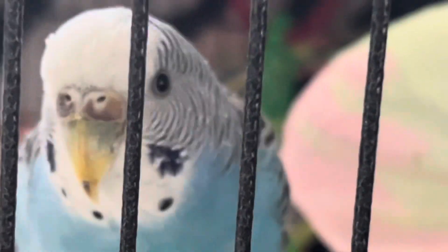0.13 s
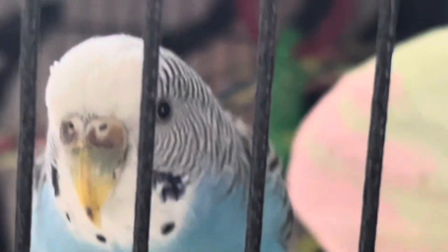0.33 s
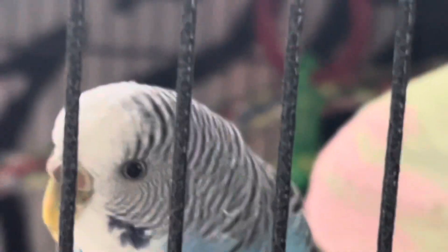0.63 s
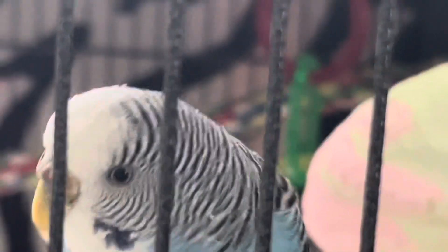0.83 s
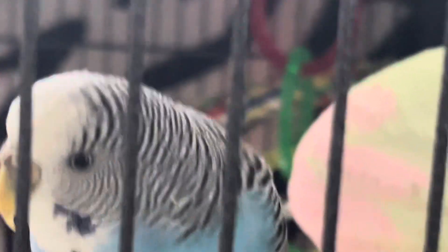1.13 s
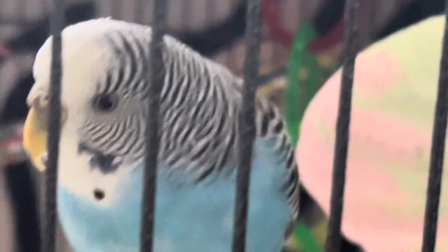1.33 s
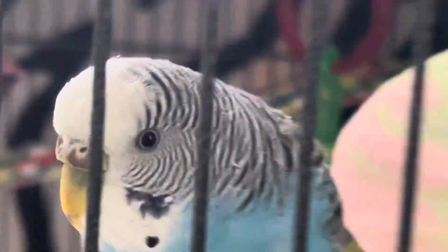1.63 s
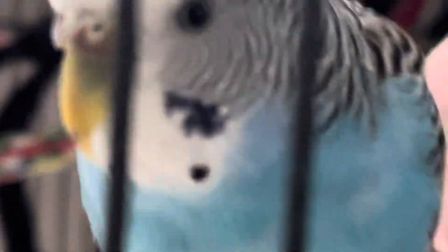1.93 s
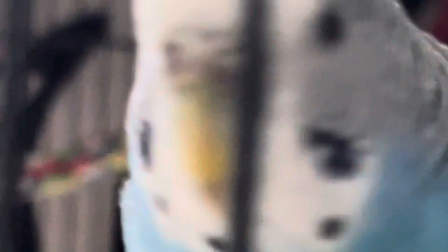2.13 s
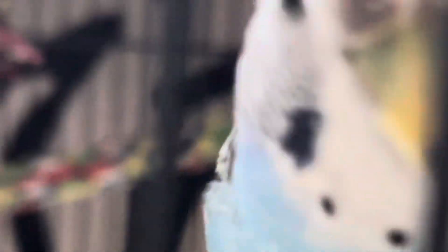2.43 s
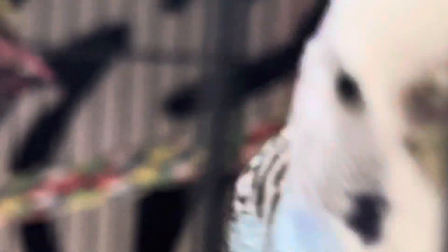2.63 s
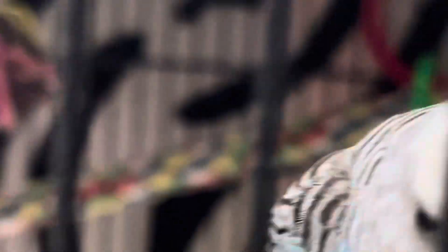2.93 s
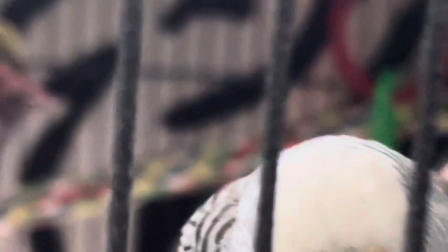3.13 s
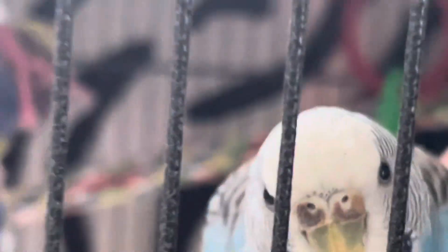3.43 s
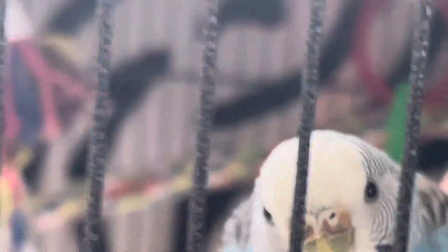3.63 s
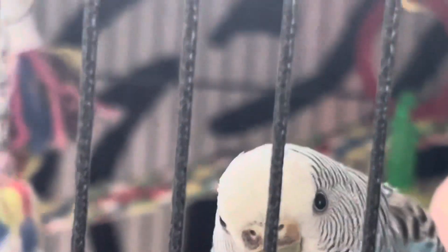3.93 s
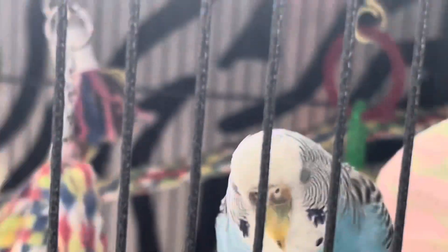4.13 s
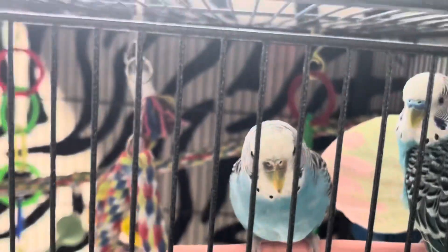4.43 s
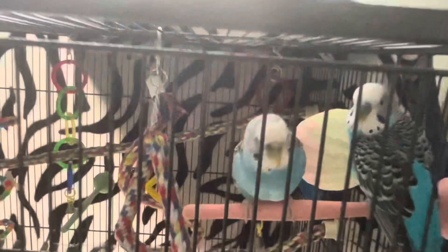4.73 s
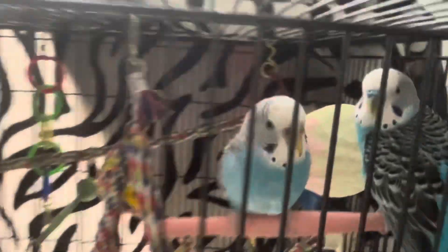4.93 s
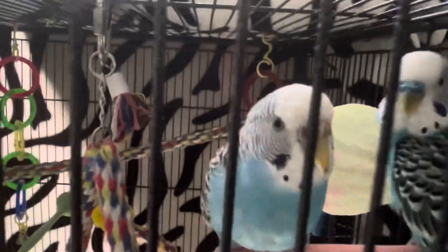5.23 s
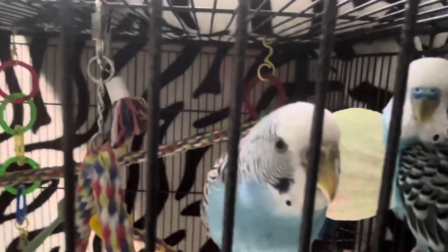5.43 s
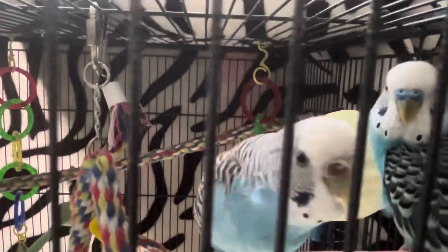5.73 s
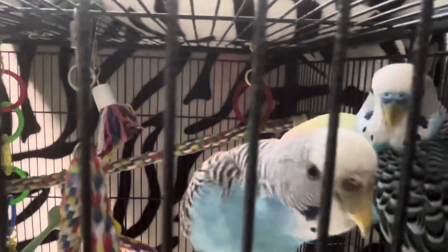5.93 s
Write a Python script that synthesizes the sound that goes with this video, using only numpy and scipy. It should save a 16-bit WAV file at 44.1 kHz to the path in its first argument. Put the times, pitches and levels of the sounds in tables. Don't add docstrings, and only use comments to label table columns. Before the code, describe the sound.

A quiet living room with a faint low hum, recorded close in stereo beside a budgerigar cage. Feathers stir, then from 0.23 to 0.44 s a loud, rapid run of fractured chirps ends in a strong pressed call. At 0.67-1.1 s come fluttering, hoarse chirps, running into a softer swooping warble with small rasps until 1.46 s. After a pause, beak clicks at 1.9 s and a low perch thump at 2.0 s. From 2.35 to 3.3 s, clipped low chatter mixes with clicks and dry rasps, thinning out. A low chirp at 3.6 s and a thump precede bright, wide-ranging whistles at 3.75-3.95 s, loud chirps at 4.04-4.22 s and frayed squawks with feather rustle at 4.34-4.5 s. Then a faint creaky rasp at 4.7 s, a short whistle and click near 4.96 s, and from 5.56 s clicks and soft, airy murmurs until about 6.1 s.

```python
import sys
import numpy as np
from scipy import signal
from scipy.fft import rfft, irfft, next_fast_len
from scipy.io import wavfile

SR = 44100
rng = np.random.default_rng(int(sys.argv[2]) if len(sys.argv) > 2 else 0)


def generate_wav(sig):
    pcm = np.round(np.clip(np.atleast_2d(sig).T, -1, 1) * 32767).astype(np.int16)
    wavfile.write(sys.argv[1], SR, pcm)


def ratio(d):
    e = np.asarray(d, float) / 20
    return 10 ** e


N = 268172

SLIDE, FALL, SWOOP, SCOOP = (1.0, -.88), (1.0, -.42), (1.0, .06), (1.0, .48)
DIP, FLICK, LIFT, EASE = (0.801, 1.0), (0.11, 0.99), (-.38, 1.0), (1.0, -.6)


def rms_one(x):
    return x / np.sqrt(np.mean(np.abs(x) ** 2) + 1e-20)


def at_hz(points, hz):
    point_hz, point_db = np.array(points).T
    return np.interp(np.log(hz + 1), np.log(point_hz), point_db)


def colour(x, points, turn=None):
    size = next_fast_len(N)
    hz = np.fft.rfftfreq(size, 1 / SR)
    lag = np.exp(-1j * np.pi * at_hz(turn, hz)) if turn else 1
    return irfft(rfft(x, size) * ratio(at_hz(points, hz)) * lag, size)[:N]


def low_pass(x, cutoff_hz):
    return signal.sosfilt(signal.butter(2, cutoff_hz, fs=SR, output="sos"), x)


def wobble(rate_hz):
    return rms_one(low_pass(rng.standard_normal(N), rate_hz))


def add(track, s, sound):
    i = round(s * SR)
    track[i:i + len(sound)] += sound[:N - i]


def steady_hum(spectrum, level_db):
    level = ratio(level_db + 0.8 * wobble(3.4))
    return level * rms_one(colour(rng.standard_normal(N), spectrum))


# (f/Hz, level/dB)
HUM = [(24, -32.5), (50, 7), (76, 0.5), (125, -8), (426, -16), (747, -25.5), (1500, -37), (1950, -53.5),
       (3300, -120)]
# (f/Hz, level/dB)
HUM_SIDE = [(15, -54), (25, 5), (305, -1), (1170, -9), (1530, -4.5), (2920, -21), (5010, -58), (5730, -20),
            (8580, -24.5), (13000, -60)]


def home_hum():
    return steady_hum(HUM, -53), steady_hum(HUM_SIDE, -64.0)


def bouts(events):
    t = np.arange(N) / SR
    levels_db = [peak_db - 10 * np.abs(t - s) / fade_s for s, peak_db, fade_s in events]
    return ratio(np.max(levels_db, axis=0))


# (f/Hz, level/dB per Hz)
FEATHERS = [(710, -54.5), (1200, -6.5), (1880, 2), (2260, -10), (3940, -5), (7980, -22.5), (13100, -17),
            (15500, -57.5)]
# (f/Hz, level/dB per Hz)
STIR = [(500, -18), (900, -8), (2000, 7), (3500, -4.0), (5500, -11), (7500, -15), (9000, -45.0)]
# (t/s, peak level/dB, time to fade by 10 dB/s)
SHIFTS = [(0.27, -56, 0.22), (1.1, -68, .25), (1.49, -56, 0.04), (1.72, -66, .07), (2.05, -68, .15),
          (2.85, -65, 0.1), (3.3, -60, .2), (4.15, -61.5, 0.2), (4.37, -42, 0.0682), (4.72, -65, 0.3),
          (4.97, -54.5, 0.19), (5.39, -65, 0.23), (5.72, -57, 0.22)]
# (t/s, peak level/dB, time to fade by 10 dB/s)
STIRS = [
    (0.88, -51.5, 0.02),
    (2.76, -63, 0.05),
    (3.35, -59, 0.06),
    (4.56, -67, .12),
    (5.16, -67, .07),
    (5.8, -66.5, .1),
]


def rustle():
    sparks = 1 + 2.5 * (rng.random(N) < .01)
    grains = rng.standard_normal(N) * sparks * ratio(2.8 * wobble(25.0))
    stir = rng.standard_normal(N) * ratio(2.5 * wobble(12.0))
    still_db, far_still_db = -86.0, -73.5
    feathers = (bouts(SHIFTS) + ratio(still_db)) * rms_one(colour(grains, FEATHERS))
    far = (bouts(STIRS) + ratio(far_still_db)) * rms_one(colour(stir, STIR))
    return feathers + far


# (t/s, depth level/dB, half width/s)
CATCHES = [(0.2915, -8, .001), (0.2965, -9, .001), (0.3205, -12, .001), (0.3355, -6, .001),
           (0.3425, -12, .001), (0.3675, -8, .0015), (0.3775, -6, .001), (0.687, -8, .001),
           (0.693, -10, .001), (0.7285, -8, .003), (0.747, -6, .0015), (4.1375, -10, .0015),
           (4.159, -16, .001), (4.1975, -9, .001), (4.2005, -7, .0007), (4.2063, -7, .001),
           (4.365, -8, .004), (4.3745, -7, .001), (4.3845, -7, .0007), (4.3945, -14, .001),
           (4.4035, -10, .001), (4.426, -8, .002), (4.4325, -8, .0015), (4.4425, -6, .0015),
           (4.4515, -9, .0015), (4.4605, -7, .001), (4.108, -8, .004), (1.285, -10, .003),
           (1.336, -9, .003), (1.429, -10, .003), (0.256, -9, .006), (4.092, -10, .003), (4.174, -6, .005),
           (4.4665, -6, .001)]


def catches():
    t = np.arange(N) / SR
    shut_db = np.zeros(N)
    for s, depth_db, half_s in CATCHES:
        near = slice(round((s - .02) * SR), round((s + .02) * SR))
        shut_db[near] += depth_db * np.exp(-((t[near] - s) / half_s) ** 2)
    return ratio(shut_db)


def swell(n, edge_s, arch):
    t = np.arange(n) / SR
    edges = np.clip(np.minimum(t, t[-1] - t) / edge_s, 0, 1)
    middle = 1 - arch + arch * np.sin(np.pi * (t / t[-1]) ** .75)
    return np.sin(np.pi / 2 * edges) ** 2 * middle


# (f/Hz, level/dB)
THROAT = [(400, -17), (900, -3.5), (1400, -1), (2000, 2), (2800, -3), (3700, -4), (5000, -9), (8000, -13),
          (15000, -13)]
# (f/Hz, level/dB per Hz)
BREATH = [(900, -47), (1500, -15), (2200, 22.5), (4000, 6), (6000, -5), (10000, -7), (15000, 2)]


def sing(notes, octave_db, tilt_db, rough, blur_hz, breath_db, arch, waver=0.014, throbs=None, sharp=0.0, fray=0.1):
    voice, air, carried = np.zeros(N), np.zeros(N), 0
    sway, shake, drift = wobble(blur_hz), wobble(blur_hz), wobble(70.0)
    k = np.arange(1, 13)[:, None]
    for row, (s, end_s, middle_hz, bend_hz, level_db, gesture) in enumerate(notes):
        start_hz, end_hz = middle_hz + bend_hz * np.array(gesture)
        i = round(s * SR)
        n = min(round((end_s - s + 0.0016) * SR), N - i)
        u = np.linspace(0, 1, n)
        per_s, scatter, steady = throbs[row] if throbs else (0, 1, 1)

        hz = 2 * (u - .5) * ((u - 1) * start_hz + u * end_hz) + 4 * u * (1 - u) * middle_hz
        hz = hz * (1 + waver * drift[i:i + n])
        phase = carried + 2 * np.pi * np.cumsum(hz) / SR
        carried = phase[-round(.0016 * SR)]
        jitter = rough * scatter * 1.37 * shake[i:i + n] * np.sqrt(k)

        thin = tilt_db * np.log2(k) * np.clip(hz / 1900, .1, 1.3)
        softness_db = max(-29 - level_db, 0)
        thin -= 5 * softness_db * np.clip(np.log2(k * hz / 3200), 0, 1) * (k > 1)
        gains = ratio(at_hz(THROAT, k * hz) + thin + octave_db * (k == 2)) * (k * hz < 15500)
        passed = np.sqrt((gains ** 2).sum(axis=0) / 2)

        flicker = np.abs(1 + fray * shake[(i + 997 * k + np.arange(n)) % N])
        tone = (gains * flicker * np.sin(k * phase + jitter)).sum(axis=0) / passed
        tuned = (passed / passed.max()) ** .65
        shape = ratio(level_db) * tuned * swell(n, .0014, arch) * np.abs(1 + rough * sway[i:i + n])
        if throbs:
            beats = np.abs(np.sin(np.pi * per_s * u * n / SR)) ** sharp
            shape = shape * 1.58 * (steady + beats) / (1 + steady)
        onset_s = max(s - .0015, 0)
        add(voice, onset_s, tone * shape)
        add(air, onset_s, shape * ratio(.2 * (level_db + 20)))
    hiss = colour(rng.standard_normal(N) * ratio(2.5 * wobble(60.0)), BREATH)
    return catches() * (voice + ratio(breath_db) * air * rms_one(hiss))


# (t/s, end t/s, middle f/Hz, bend f/Hz,
# level/dB, gesture)
HOARSE = [(0.0, 0.079, 2556, -180, -54.5, DIP), (0.9, 0.942, 3580, 700, -39, FLICK),
          (0.9, 0.935, 2450, 50, -40, DIP), (0.94, 0.972, 2950, 1350, -38, FALL),
          (0.972, 0.992, 1720, 120, -38, DIP), (1.008, 1.036, 2380, 600, -36, LIFT),
          (0.424, 0.436, 3050, 100, -24, LIFT), (4.358, 4.384, 2500, -300, -34, SLIDE),
          (4.405, 4.475, 3100, -300, -35, SLIDE), (0.34, 0.375, 3500, -400, -30, SLIDE),
          (5.59, 5.7, 4200, -200, -61, DIP), (5.7, 5.77, 3900, 200, -60, DIP),
          (5.77, 5.84, 3500, 100, -58, DIP), (0.983, 1.015, 2400, 1967, -32.5, FALL),
          (1.028, 1.082, 3300, -1000, -23.5, FALL), (1.055, 1.08, 2578, 491, -30, SLIDE),
          (1.08, 1.17, 3370, 93, -42.5, DIP), (4.336, 4.353, 3060, 680, -40, SLIDE),
          (4.992, 5.04, 1888, 245, -44, SLIDE)]


def hoarse_calls():
    return sing(HOARSE, -7.0, -11.0, .4, 380.0, -14.0, .85, waver=.02)


# (t/s, end t/s, middle f/Hz, bend f/Hz, level/dB, gesture)
OPENING = [(0.227, 0.264, 2800, -950, -42.5, LIFT), (0.256, 0.27, 3050, -170, -25, FALL),
           (0.298, 0.303, 2300, 100, -24, DIP), (0.268, 0.282, 3206, -40, -21, LIFT),
           (0.282, 0.3, 2750, 560, -19, SLIDE), (0.32, 0.336, 3600, 400, -22, FALL),
           (0.322, 0.338, 2092, -175, -31, FLICK), (0.335, 0.343, 2906, 450, -17.5, SLIDE),
           (0.356, 0.367, 2050, 500, -17, SLIDE), (0.377, 0.389, 2000, -150, -15, FALL),
           (0.377, 0.39, 4000, -150, -27, FALL), (0.389, 0.412, 2080, -60, -13.5, SCOOP),
           (0.402, 0.413, 4250, -150, -28, FALL), (0.665, 0.678, 4340, 225, -45, SLIDE),
           (0.682, 0.693, 2400, 900, -27, SLIDE), (0.702, 0.706, 1950, 150, -24, SLIDE),
           (0.708, 0.732, 3000, -1100, -24, EASE), (0.732, 0.752, 2630, 950, -26.5, SWOOP)]
# (t/s, end t/s, middle f/Hz, bend f/Hz, level/dB, gesture)
WARBLE = [(1.07, 1.088, 1820, 700, -29, SWOOP), (1.088, 1.108, 1340, 260, -32, FALL),
          (1.112, 1.123, 1770, -58, -36, SLIDE), (1.132, 1.165, 2015, -490, -29.5, FALL),
          (1.177, 1.184, 3000, 400, -42, SWOOP), (1.187, 1.212, 1977, 1050, -30.5, SCOOP),
          (1.212, 1.22, 1316, 730, -32.5, FALL), (1.241, 1.269, 1150, 340, -38, SWOOP),
          (1.283, 1.293, 2990, 1340, -43, SWOOP), (1.296, 1.312, 2330, 162, -30.5, FALL),
          (1.336, 1.36, 1954, 2170, -30.5, SCOOP), (1.387, 1.42, 1030, 410, -37.5, SCOOP),
          (1.427, 1.442, 2570, 1290, -32, SWOOP), (1.443, 1.463, 1926, 370, -33, SWOOP)]
# (t/s, end t/s, middle f/Hz, bend f/Hz, level/dB, gesture)
CHATTER = [(1.98, 1.992, 651, 66, -41, SLIDE), (2.398, 2.426, 1070, -65, -38.5, LIFT),
           (2.553, 2.581, 744, 1016, -36.5, DIP), (2.579, 2.602, 1023, 557, -33, SLIDE),
           (2.64, 2.648, 1100, -220, -37, SLIDE), (2.648, 2.668, 1100, 220, -33.5, SLIDE),
           (2.69, 2.714, 726, 390, -37, SCOOP), (2.729, 2.739, 2260, 1080, -36.5, SLIDE),
           (2.743, 2.76, 1140, 558, -33.5, SWOOP), (2.757, 2.77, 2117, -840, -32, SLIDE),
           (2.84, 2.855, 960, 180, -36.5, FALL), (2.854, 2.871, 1495, -435, -33, SCOOP),
           (2.878, 2.892, 1430, 1040, -35, SWOOP), (2.897, 2.908, 2430, -640, -31.5, FLICK),
           (2.91, 2.932, 1080, 492, -35.5, SWOOP), (2.999, 3.035, 1400, -265, -36, DIP),
           (3.068, 3.076, 1202, 285, -45, SLIDE), (3.115, 3.127, 1310, -230, -46.5, SLIDE),
           (3.147, 3.183, 1407, -250, -40, FALL), (3.263, 3.282, 1136, -325, -43, SLIDE),
           (3.594, 3.622, 476, 63, -31, SWOOP)]
# (t/s, end t/s, middle f/Hz, bend f/Hz, level/dB, gesture)
FLOURISH = [(3.757, 3.785, 3210, -800, -32.5, SWOOP), (3.786, 3.805, 2170, 1599.5, -29, FLICK),
            (3.807, 3.832, 4980, -750, -43, SCOOP), (3.833, 3.85, 2575, 2050, -27, SCOOP),
            (3.856, 3.868, 1830, 1499, -28, FALL), (3.872, 3.884, 2330, -780, -35, SLIDE),
            (3.886, 3.9, 2384, -170, -27, FLICK), (3.907, 3.929, 3400, 1150, -32.5, LIFT),
            (4.04, 4.061, 2730, -850, -24, DIP), (4.063, 4.088, 1336, 510, -29.5, FALL),
            (4.092, 4.104, 2115, -920, -25, SLIDE), (4.104, 4.118, 3230, -1020, -29, FLICK),
            (4.121, 4.15, 1710, 310, -29, FLICK), (4.15, 4.171, 2156, -370, -23.5, DIP),
            (4.379, 4.394, 3653, -200, -21, FALL), (4.395, 4.404, 2900, 200, -23.5, SLIDE),
            (4.966, 4.984, 1760, 580, -29.5, FLICK), (4.986, 4.992, 2200, 1030, -30, LIFT),
            (5.044, 5.085, 1142, -132, -52, LIFT)]


def clear_whistles():
    notes = OPENING + WARBLE + CHATTER + FLOURISH
    return sing(notes, 1.5, -20.0, 0.2, 130.0, -18.5, .55)


# (t/s, end t/s, middle f/Hz, bend f/Hz, level/dB, gesture)
THROBBED = [
    (0.3047, 0.319, 2700, 700, -18, LIFT),
    (0.3448, 0.358, 2500, 48, -20, DIP),
    (0.752, 0.795, 2300, 450, -26, DIP),
    (0.858, 0.9, 3500, -400, -18.5, DIP),
    (3.928, 3.95, 3750, 600, -28.5, FALL),
]
# (throb f/Hz, scatter, steady share)
THROBS = [(300.0, 1.3, .06), (222.0, 0.87, .08), (345, 1.2, .5), (158, 5.0, .03), (417, 1.2, 2.5)]


def throbbing_calls():
    return sing(THROBBED, 2.7, -22.0, 0.18, 430.0, -16.0, .92, throbs=THROBS, sharp=1.7)


# (t/s, end t/s, middle f/Hz, bend f/Hz, level/dB, gesture)
PRESSED = [
    (0.412, 0.436, 1878, 300, -15, DIP),
    (4.174, 4.198, 1930, 70, -19.5, DIP),
    (0.692, 0.698, 1400, 100, -32, SLIDE),
    (0.367, 0.377, 1550, 150, -24, DIP),
    (4.198, 4.216, 2350, -480, -16, DIP),
]


def pressed_calls():
    return sing(PRESSED, 12.0, -5.5, .17, 320.0, -18.0, .6, waver=.015, fray=.15)


def knocks(events, width_hz, crack, soft_s):
    out, t = np.zeros(N), np.arange(2600) / SR
    for s, peak_db, hz in events:
        body = np.sin(2 * np.pi * hz * t) * np.exp(-np.pi * width_hz * t) * (1 - np.exp(-t / soft_s))
        sound = body + crack * rng.standard_normal(len(t)) * np.exp(-t / 0.00057)
        add(out, s, ratio(peak_db) * sound / np.max(np.abs(sound)))
    return out


# (t/s, peak level/dB, throat f/Hz)
CLICKS = [(1.926, -31, 2390), (1.93, -26, 2120), (1.94, -28, 3020), (1.947, -23, 2130), (2.353, -39, 1820),
          (2.359, -34, 980), (2.515, -47, 977), (2.526, -34, 2110), (2.531, -31, 2130), (2.628, -40, 1700),
          (0.677, -44, 2500), (2.978, -39, 1220), (4.669, -48, 2100), (4.955, -31, 1800), (5.562, -33, 945),
          (5.571, -30, 1490), (5.88, -34, 2740), (5.903, -27, 1330)]


def beak_clicks():
    clicks = low_pass(knocks(CLICKS, 480.0, 0.26, .0001), 7000.0)
    return clicks + .6 * np.roll(clicks, round(.0016 * SR))


def ring(clicks, hz, width_hz):
    r = np.exp(-np.pi * width_hz / SR)
    return signal.lfilter([1, 0, -1], [1, -2 * r * np.cos(2 * np.pi * hz / SR), r * r], clicks)


# (t/s, length/s, pulse f/Hz, level/dB, beak opening 0-1)
RASPS = [(1.218, 0.021, 300.0, -39.5, .1), (1.276, 0.0026, 320.0, -51, .4),
         (1.369, 0.015, 880.0, -37.5, .05), (1.434, 0.023, 710.0, -33.5, 0.99),
         (1.908, 0.014, 340.0, -50, .52), (2.38, 0.036, 500.0, -43, .85), (2.606, 0.011, 880.0, -37, .15),
         (2.673, 0.014, 670.0, -38, 0.33), (2.726, 0.0046, 310.0, -55, .55),
         (2.794, 0.016, 420.0, -39.5, 0.43), (2.937, 0.016, 700.0, -41, .25), (3.08, 0.024, 850.0, -44, .2),
         (3.233, 0.022, 880.0, -45, .4), (3.616, 0.025, 650.0, -45, .7), (4.705, 0.11, 150.0, -52, .35),
         (4.83, 0.03, 70.0, -54, .15), (5.114, 0.03, 65.0, -51, 0.39), (5.891, 0.02, 370.0, -43, 0.89),
         (5.572, 0.016, 500.0, -46, .3), (5.612, 0.065, 400.0, -52, .2)]


def rasps():
    out = np.zeros(N)
    shut_hz, open_hz, shut_db, open_db = 1520, 2870, -41.5, -1.5
    for s, length, per_s, level_db, beak in RASPS:
        hz = shut_hz + (open_hz - shut_hz) * beak ** 3.8
        bright_db = shut_db + (open_db - shut_db) * beak
        n = round(length * SR)
        gap_luck, force_luck = rng.standard_normal((2, 120))
        at = (np.cumsum(ratio(1.0 * gap_luck)) * SR / per_s).astype(int) - round(SR / per_s / 2)
        slaps = np.zeros(n + 200)
        slaps[at[at < n]] = ratio(3.0 * force_luck[at < n])
        breath = rng.standard_normal(n + 200) * (np.arange(n + 200) < n)
        slaps += 0.22 * per_s / 900 * breath
        low = ring(slaps, hz * 0.69, 790.0) - 0.73 * ring(slaps, hz * 1.49, 740.0)
        low = low_pass(low, 3600.0)
        upper = rms_one(ring(slaps, 5200.0, 2700.0))
        sound = rms_one(low) + ratio(bright_db - 4.0) * upper
        add(out, s, ratio(level_db) * rms_one(sound * swell(n + 200, 0.0025, 0.27)))
    return out


# (t/s, peak level/dB, f/Hz)
THUMPS = [
    (2.027, -37, 143.6),
    (3.665, -39, 140),
    (4.467, -43.5, 172),
    (4.941, -45.5, 145),
    (5.873, -47, 296),
]


def perch_thumps():
    return knocks(THUMPS, 30.0, .0, 0.00095)


# (t/s, end t/s, middle f/Hz, bend f/Hz, level/dB, gesture)
SQUEAK = [
    (4.335, 4.397, 951, -81, -42.5, SWOOP),
    (5.8, 6.08, 6020, -30, -76, FALL),
]


def squeaks():
    return sing(SQUEAK, -25.0, -30.0, .15, 40.0, -40.0, .1, waver=.001)


# (t/s, end t/s, middle f/Hz, bend f/Hz, level/dB, gesture)
SQUAWKS = [
    (4.348, 4.382, 2250, -200, -29, SWOOP),
    (4.403, 4.435, 1795, 220, -24, LIFT),
    (4.435, 4.47, 2250, -200, -23, SWOOP),
    (4.468, 4.5, 2230, 60, -37, SLIDE),
]


def squawks():
    return sing(SQUAWKS, 13.0, -6.5, .28, 380.0, -14.0, .5, waver=.022, fray=.3)


# (t/s, end t/s, middle f/Hz, bend f/Hz, level/dB, gesture)
MURMURS = [
    (5.586, 5.613, 760, -70, -41, DIP),
    (5.614, 5.682, 1060, -280, -46.5, SCOOP),
    (5.68, 5.737, 1060, -216, -46, DIP),
    (5.738, 5.805, 960, -87, -46.5, DIP),
    (5.915, 6.0, 729, 150, -48, FLICK),
    (6.052, 6.08, 1080, 179, -61, LIFT),
]


def murmurs():
    return sing(MURMURS, 0.0, -19.0, .22, 120.0, -8.0, .3, waver=.025, fray=.2)


def room(x):
    t60_s = .41
    t = np.arange(round(.6 * SR)) / SR
    tail = rng.standard_normal(len(t)) * ratio(-60 * t / t60_s) * (t > .004)
    tail = signal.lfilter([1], [1, -.5], tail)
    return signal.fftconvolve(x, tail / np.sqrt(np.sum(tail ** 2)))[:N]


# (f/Hz, level/dB)
SUM = [(100, -9.5), (7000, 3), (7650, -5.5), (8400, -20), (9200, -2), (11000, -3.5), (13800, -6),
       (14900, -13), (15700, -25.5)]
# (f/Hz, level/dB)
DIFFERENCE = [(300, -30), (1500, -6.5), (3000, -15), (5200, -14), (8300, 7), (10300, -7), (11500, -41.5),
              (13500, -7.5), (15700, -6.5)]
# (f/Hz, half turns)
TURN = [(800, 0.67), (2500, 0.74), (4500, 0.55), (9000, 0.5), (13000, 0.5)]


def microphone_ports(birds):
    turn_s, far_share = 3.4, .5
    aim = np.interp(np.arange(N) / SR, [turn_s, turn_s + .2], [1, 0])
    drawn_back = [(hz, .5 + far_share * (turns - .5)) for hz, turns in TURN]
    mid = colour(birds + ratio(-18.0) * room(birds), SUM)
    side = colour(birds * aim, DIFFERENCE, TURN) + colour(birds * (1 - aim), DIFFERENCE, drawn_back)
    return mid, side + ratio(-26.0) * room(birds)


def scene():
    mid_hum, side_hum = home_hum()
    birds = rustle() + hoarse_calls() + clear_whistles() + throbbing_calls() + pressed_calls()
    birds += beak_clicks() + rasps() + squeaks() + squawks() + murmurs()
    mid, side = microphone_ports(birds)
    mid = mid + mid_hum + perch_thumps()
    side = side + side_hum
    return np.array([mid + side, mid - side])


def band_limit(x):
    return signal.sosfilt(signal.butter(12, 15780, fs=SR, output="sos"), x)


def record(dry):
    cut = signal.sosfilt(signal.butter(4, 38.0, "high", fs=SR, output="sos"), dry)
    return band_limit(cut)


dry = scene()
out = record(dry)
generate_wav(out)
```